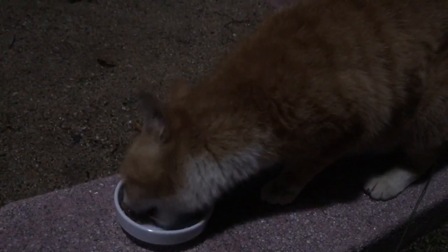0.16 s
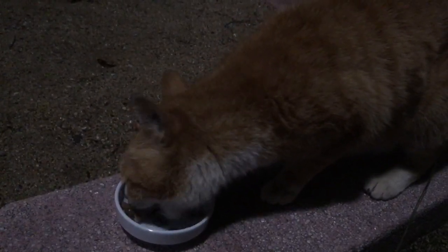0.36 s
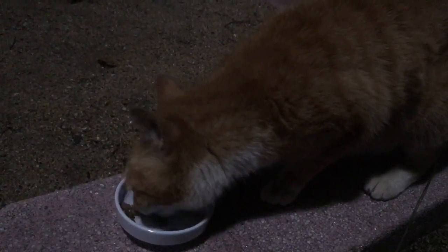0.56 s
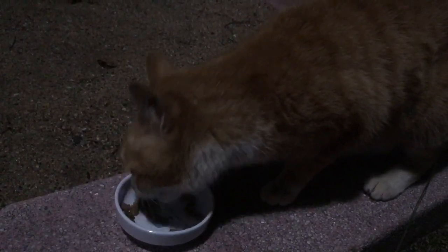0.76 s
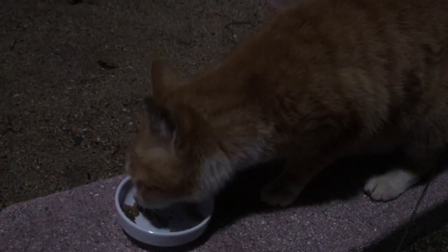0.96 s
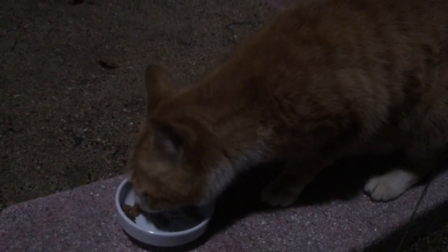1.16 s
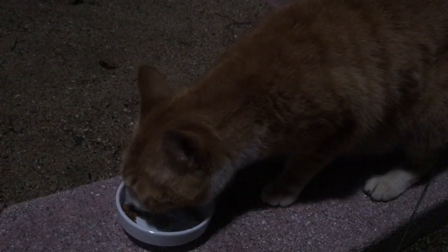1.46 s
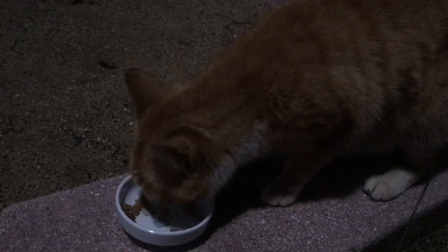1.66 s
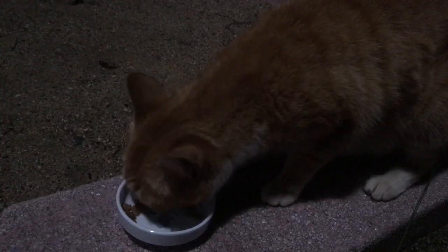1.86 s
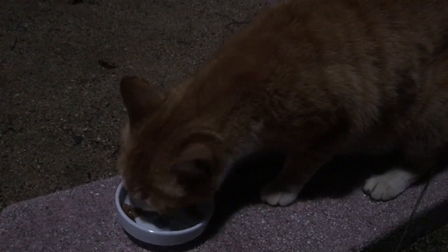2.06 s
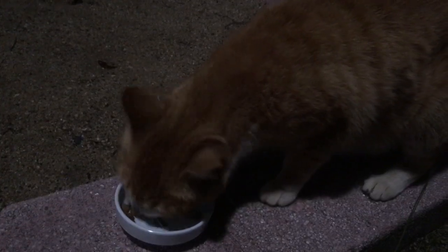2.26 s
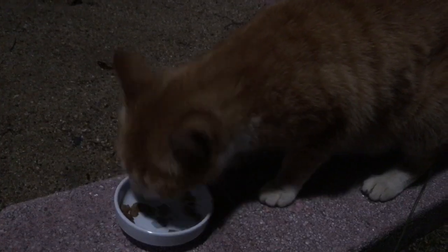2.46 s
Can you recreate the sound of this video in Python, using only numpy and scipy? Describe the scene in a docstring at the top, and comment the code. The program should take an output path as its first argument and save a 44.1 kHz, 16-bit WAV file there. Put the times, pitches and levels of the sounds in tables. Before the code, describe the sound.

A cat crunches dry food close to the microphone: a dense flurry of sharp cracks, a pause, smaller bursts, then sparse light clicks, with tiny crumb ticks, over faint distant rumble and hiss in a quiet yard.

```python
"""Hard dry food clicks and cracks in short flurries: a cat eats from a small dish outdoors on a quiet night.
Each contact is a few-millisecond ring of shared modes plus a broadband snap; crumbs tick in between.
The mouth pops softly once, and dull bumps, short low pulses, come with the pop and near the end.
Behind the dish lie a faint answer of the yard (decaying noise), distant rumble, hiss and hums (shaped noise)
and a very faint high whistle (a gliding sine and its octave)."""
import sys
import numpy as np
from scipy import signal
from scipy.fft import rfft, irfft, next_fast_len
from scipy.io import wavfile
from scipy.ndimage import map_coordinates

SR = 44100
rng = np.random.default_rng(int(sys.argv[2]) if len(sys.argv) > 2 else 0)


def unload_audio(sound):
    """Save the sound as a 16-bit wav file, at the path given as the first command line argument."""
    columns = np.transpose(np.atleast_2d(sound))
    # keep every value between -1 and 1, then stretch to whole-number steps
    steps = np.round(np.clip(columns, -1, 1) * 32767)
    wavfile.write(sys.argv[1], SR, steps.astype(np.int16))


N = 114660


def amp(db):
    """Decibels to gain."""
    return 10 ** (np.asarray(db) / 20)


def unit(x):
    """Scale to rms 1."""
    return x / np.sqrt(np.mean(x ** 2) + 1e-20)


def along(points, hz):
    """Interpolate (Hz, value) points on a log frequency axis."""
    point_hz, value = np.transpose(points)
    return np.interp(np.log(hz + 1), np.log(point_hz + 1), value)


def wobble(rate):
    """A smooth random curve through `rate` random knots a second."""
    knots = rng.standard_normal(2048)
    return map_coordinates(knots, [np.arange(N) * rate / SR], mode="wrap")


def filtered(x, response):
    """Multiply the spectrum of x by a response of frequency, zero-padded so that tails do not wrap."""
    size = next_fast_len(N + SR // 2)
    return irfft(rfft(x, size) * response(np.fft.rfftfreq(size, 1 / SR)), size)[:N]


def causal(gain):
    """The sharp-onset (minimum-phase) impulse response that has this magnitude spectrum."""
    cepstrum = irfft(np.log(gain + 1e-6))
    half = len(cepstrum) // 2
    fold = np.r_[1, np.full(half - 1, 2), 1, np.zeros(half - 1)]
    return irfft(np.exp(rfft(cepstrum * fold)))


def add(track, s, sound):
    """Mix a sound in at s seconds."""
    i = int(np.clip(round(s * SR), 0, N))
    track[i:i + len(sound)] += sound[:N - i]


def crunch(count=4):
    """Food breaking between the teeth: each click is a main fracture followed by a few tiny splinters."""
    # Clicks of the food: start_s, level_db, treble_db
    clicks = [(.084,-39.5,-1),(.1065,-44,2),(.114,-42,-3),(.1005,-47.5,7),(0.1724,-40.5,-26),(.195,-42.5,4.5),(0.2116,-30.5,-7),(0.2199,-34.5,-2),(0.2296,-56,6),(0.2347,-36,-12),
              (0.2448,-43.5,1),(0.2515,-36.5,-1.5),(0.2616,-36.5,6),(0.2694,-31,-6.5),(0.277,-44,9),(0.2932,-41,2.5),(0.321,-60,15),(.3365,-30,6.5),(.3434,-41.5,7),(0.3504,-39.5,4),(0.369,-37,-6),(0.3786,-36,0),
              (.382,-38.5,-7),(.3904,-40,10),(.4065,-56,18),(0.4253,-41.5,6),(0.432,-39,15),(0.4363,-24.5,7.5),(0.449,-40,-1),(0.4693,-35.5,-21),(0.4779,-31,1),(0.4865,-35,6),(0.4925,-36,3),
              (0.5084,-43,8.5),(0.5318,-31,9.5),(0.5351,-31,-2),(0.554,-50,19),(0.5645,-21,-0.5),(.569,-31,-6),(.574,-28.5,-5),(.58,-31.5,-9),(0.5855,-46,-1),(.597,-42,-11),(0.6013,-36.5,-4),
              (.6057,-37,0),(0.6158,-36.5,-4),(0.6227,-41,-5),(0.6277,-20,8.5),(.6325,-29,9),(0.651,-71,37.5),(0.6626,-41,10),(0.6709,-41.5,14),(0.6853,-51,17),(0.707,-50,19.5),(0.7212,-60.5,23.5),
              (.851,-59,-22),(1.015,-62,-15),(1.106,-60,0),(1.129,-67,15.5),(1.2465,-51,-14),(1.255,-46.5,-35),(1.284,-43.5,-7),(1.2931,-38,-1),(1.339,-47.5,-11),(1.3542,-30,2.5),(1.355,-26,6.5),(1.3707,-37,1),(1.378,-35,-1),(1.3843,-32,2),(1.402,-38.5,0),
              (1.525,-48,-4),(1.545,-34.5,4),(1.5591,-40.5,-6),(1.5714,-41.5,6.5),(1.584,-38,-17),(1.5937,-24,-2),(1.6055,-39.5,1),(1.6179,-28.5,-6.5),(1.628,-44,-9),(1.6456,-34,-29),(1.6649,-37,-6.5),
              (1.718,-49,-6),(1.7678,-46,17),(1.779,-60,21),(1.7923,-59,23),(1.96,-54.5,-13),(2.0138,-43,2.5),(2.017,-39,-1),(2.024,-52,-3),(2.027,-47,5),(2.136,-54,11),(2.1428,-41,6.5),(2.1588,-43.5,-12),(2.209,-54,14.5),(2.2246,-50,0),(2.2361,-45.5,7),
              (2.2452,-49,11),(2.3047,-37.5,-12),(2.319,-33.5,2.5),(2.3277,-45,-6),(2.3362,-48,2),(2.3518,-45,3),(2.3786,-47.5,5),(2.428,-51,-24.5),(2.455,-58,-10)]
    splinter_db, splinter_window_s = -16, .006
    out = np.zeros(N)
    for s, db, treble_db in clicks:
        add(out, s, amp(db) * contact(s, treble_db))
        splinter = contact(s, treble_db + 5)
        for lag, strength in zip(rng.random(count), rng.standard_normal(count)):
            gain = amp(db + splinter_db) * strength * (1 - lag / 2)  # later splinters are weaker
            add(out, s + splinter_window_s * lag, gain * splinter)
    return out


def contact(s, treble_db, size=2048):
    """One hard contact: the modes ring for a few ms under a broadband snap; treble_db sets its sharpness."""
    # Modes that every contact rings with, the main one first: centre_hz, width_hz, level_db
    modes = [(2238,349,3.5),(2678,290,-10),(2980,135,-11.5),(3517,115,-24),(4062,165,-20),(4550,146,-28),(5460,380,-28.5),(5935,214,-24.5),(6434,496,-24),
             (8350,200,-23.5),(8980,210,-22),(9730,400,-33),(12330,650,-38),(13700,1000,-36.5),(15000,500,-40)]
    # Broadband snap through the meal, stronger in the last bites: time_s, snap_db
    snap = [(0,-2),(1.66,2),(1.76,6),(2.6,7)]
    level_spread_db, pitch_spread = 5.5, 0.024  # contact to contact; pitch as a share of the main mode's
    crack_db, crack_spread_db, crack_db_per_treble_db = -40.5, 5.5, 0.28
    low_edge_hz, treble_hz, snap_top_hz = 1975, 3980, 7000  # the snap dulls above snap_top_hz
    smear_s, smear_step_hz, ring_delay_s = 0.000943, 712, 0.00041

    hz = np.fft.rfftfreq(size, 1 / SR)
    centre, width, db = np.transpose(modes)[:, :, None]
    centre = centre + pitch_spread * centre[0] * rng.standard_normal(centre.shape)
    above_main = centre > centre[0]  # the main mode keeps its level
    db = db + level_spread_db * rng.standard_normal(db.shape) * above_main
    peaks = amp(db) / (1 + (2 * (hz - centre) / width) ** 2)

    crack = amp(crack_db + crack_db_per_treble_db * treble_db + crack_spread_db * rng.standard_normal())
    crack = crack * amp(np.interp(s, *np.transpose(snap)))
    crack = crack / np.sqrt(1 + (hz / snap_top_hz) ** 4)

    gain = np.sqrt((peaks ** 2).sum(0) + crack ** 2)
    gain *= amp(treble_db / (1 + (treble_hz / (hz + 1)) ** 8))  # treble shelf
    gain *= 0.21 + 0.82 / (1 + (low_edge_hz / (hz + 1)) ** 24)  # weaker below the ring's lower edge

    # A fracture takes time: each band arrives a little late, and the main ring swells after the snap.
    late = np.abs(map_coordinates(rng.standard_normal(64), [hz / smear_step_hz], mode="wrap"))
    delay = smear_s * late * np.minimum(hz / treble_hz, 1) ** 2 + ring_delay_s * peaks[0]
    smear = np.exp(-2j * np.pi * np.cumsum(delay) * hz[1])
    sound = irfft(rfft(causal(gain)) * smear)[:size // 2]
    main_ring = causal(peaks[0] + amp(crack_db))
    return sound / np.abs(main_ring).max()


def crumbs(count=48):
    """Loose pieces tick at random while the muzzle works in the dish: small contacts at jittered steps."""
    # Flurries of crumb ticks: start_s, end_s, level_db
    flurries = [(.065,0.142,-52),(.19,0.306,-48.5),(0.321,0.43,-49),(0.443,0.64,-52),(1.246,1.32,-57),(1.371,1.412,-44.5),(1.556,1.66,-48.5),(2.009,2.085,-60.5),(2.127,2.26,-66.5),(2.296,2.382,-56)]
    ticks_per_s, level_spread_db = 130, 4
    treble_db, treble_spread_db = 2, 4
    out = np.zeros(N)
    for start, end, db in flurries:
        for k, (lag, strength, sharpness) in enumerate(rng.standard_normal((count, 3))):
            s = start + (k + .4 * lag) / ticks_per_s
            tick = contact(s, treble_db + treble_spread_db * sharpness, size=1024)
            if s < end:
                add(out, s, amp(db + level_spread_db * strength) * tick)
    return out


def soft_knocks():
    """A short pop of the mouth and dull bumps: cosines under bell-shaped envelopes, a cycle or two long."""
    # Dull bumps: centre_s, level_db, pitch_hz, half_length_s
    bumps = [(1.7335,-46.5,194,0.003),(1.746,-44,93,0.0092),(2.318,-48,148,0.007)]
    pop = (1.7318, -37.5, 1240, 0.00042)  # same columns
    t = np.arange(N) / SR
    out = np.zeros(N)
    for s, db, hz, half_length in [pop] + list(bumps):
        envelope = np.exp(-((t - s) / half_length) ** 2)
        out += amp(db) * envelope * np.cos(2 * np.pi * hz * (t - s))
    return out


def yard(x):
    """The answer of the surroundings: x convolved with noise that dies away at its own rate in each band."""
    # Decay time of the yard: band_hz, t60_s
    decay = [(500,0.44),(2300,0.45),(4000,0.25),(5400,0.34),(6500,1),(9000,0.26),(14000,0.066)]
    hz, t, z = signal.stft(rng.standard_normal(SR // 2), SR, nperseg=256)
    fade = amp(-60 * t / along(decay, hz)[:, None])
    tail = signal.istft(z * fade, SR, nperseg=256)[1]
    return signal.fftconvolve(x, tail / np.linalg.norm(tail))[:N]


def night():
    """Distant rumble and faint hiss as slowly wavering shaped noise, with hums as narrow bands of noise."""
    # Spectrum of the night air: band_hz, relative_level_db (per Hz)
    air_spectrum = [(20,-47),(35,-13),(45,-10),(59,-6.5),(80,-6.5),(103,-5),(140,-4.5),(180,-4.5),(232,-13.5),(324,-15),(491,-22),(834,-19.5),(1500,-27.5),(2610,-36.5),(4810,-47),(5850,-42.5),(8400,-46),(14300,-40),(15500,-44)]
    # Distant hums: pitch_hz, level_db, width_hz (as random knots a second)
    hum_bands = [(57.2,-63.5,9),(768,-81,12),(867,-76.5,12)]
    air_db, waver_db = -56.5, 0.86
    t = np.arange(N) / SR
    air = unit(filtered(rng.standard_normal(N), lambda hz: amp(along(air_spectrum, hz))))
    hums = np.zeros(N)
    for hz, db, width in hum_bands:
        drift = wobble(width) + 1j * wobble(width)
        hums += amp(db) * unit(np.real(drift * np.exp(2j * np.pi * hz * t)))
    return amp(air_db + waver_db * wobble(5.07)) * air + hums


def whistle():
    """A thin arching tone and its octave: sines whose pitch glides and jitters rapidly."""
    # Glide of the whistle: time_s, pitch_hz
    glide = [(1.22,6050),(1.289,6600),(1.39,6250),(1.48,6300),(1.6,6380),(1.8,5950)]
    level_db, octave_db, jitter_hz = -88, 1, 130  # octave relative to the tone
    t = np.arange(N) / SR
    s, hz = np.transpose(glide)
    pitch = np.interp(t, s, hz) + jitter_hz * wobble(590)
    phase = 2 * np.pi * np.cumsum(pitch) / SR
    progress = np.clip((t - s[0]) / (s[-1] - s[0]), 0, 1)
    swell = np.sqrt(np.abs(np.sin(np.pi * progress)))
    return amp(level_db) * swell * (np.sin(phase) + amp(octave_db) * np.sin(2 * phase))


def scene():
    """The cat at its dish, the yard's answer 28 dB down, and the night air behind."""
    eating = crunch() + crumbs() + soft_knocks()
    return (eating + amp(-28) * yard(eating) + night() + whistle())[None]


def record(dry):
    """The microphone chain keeps nothing above its band limit."""
    top_hz = 15400
    return filtered(dry[0], lambda hz: hz < top_hz)[None]


dry = scene()
out = record(dry)
unload_audio(out)
```